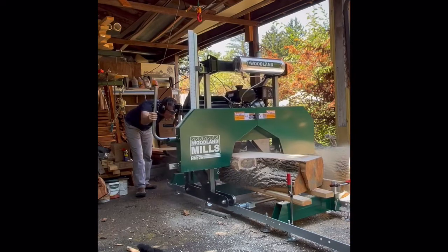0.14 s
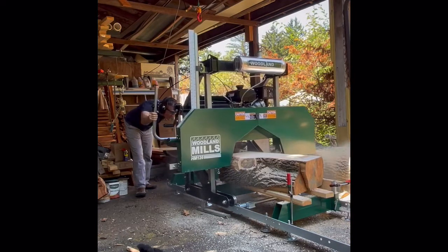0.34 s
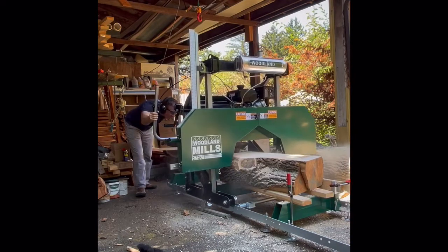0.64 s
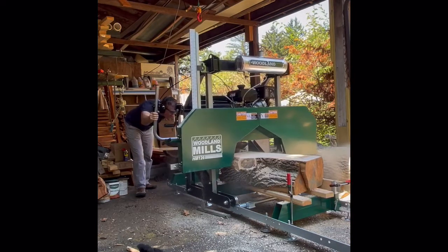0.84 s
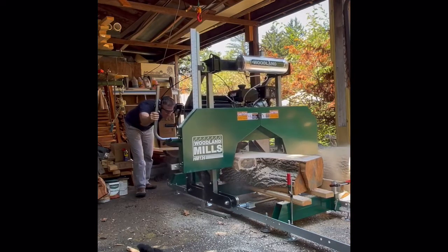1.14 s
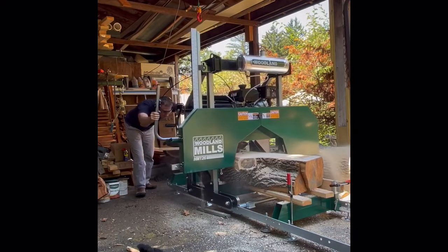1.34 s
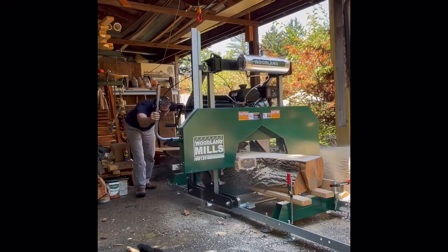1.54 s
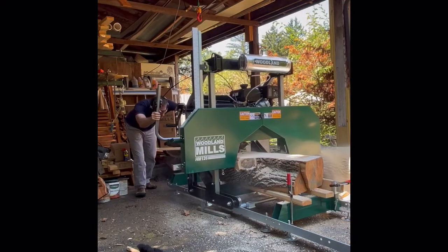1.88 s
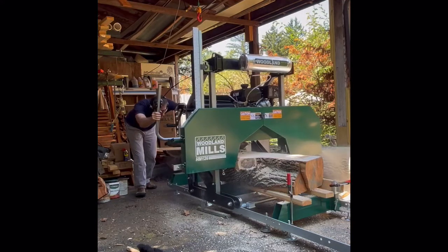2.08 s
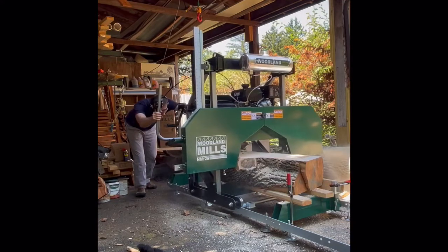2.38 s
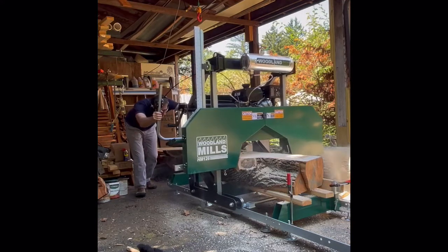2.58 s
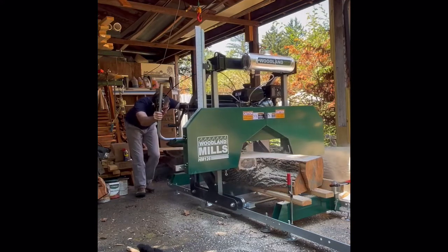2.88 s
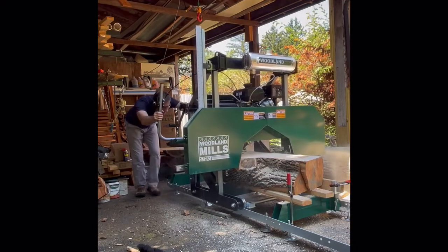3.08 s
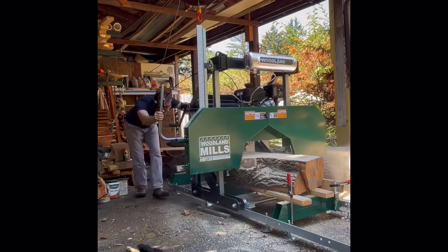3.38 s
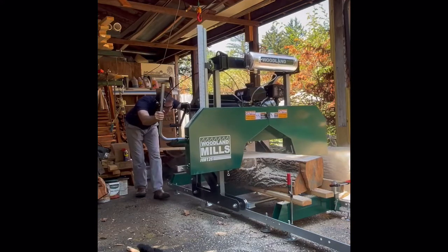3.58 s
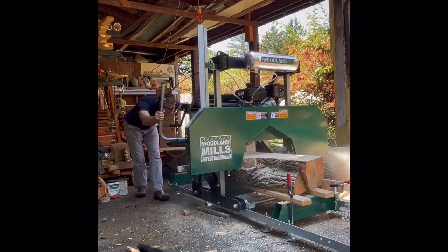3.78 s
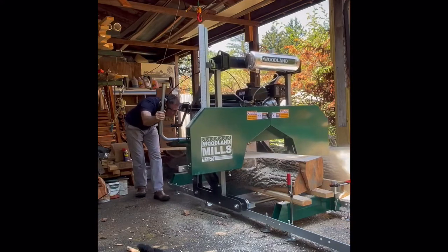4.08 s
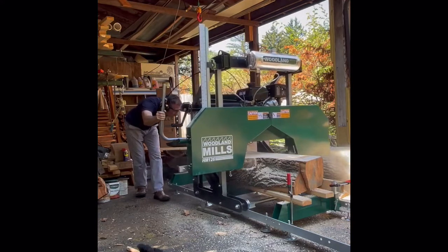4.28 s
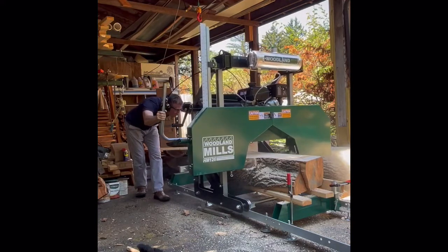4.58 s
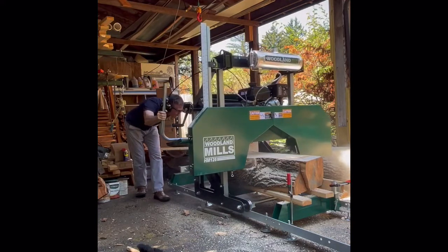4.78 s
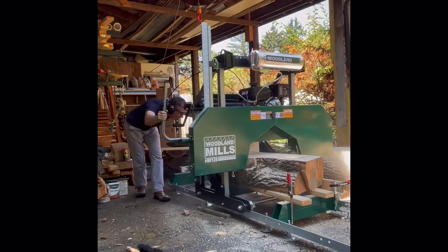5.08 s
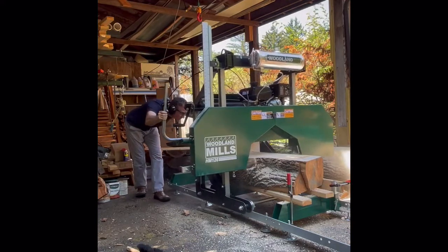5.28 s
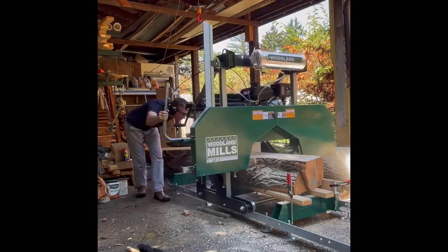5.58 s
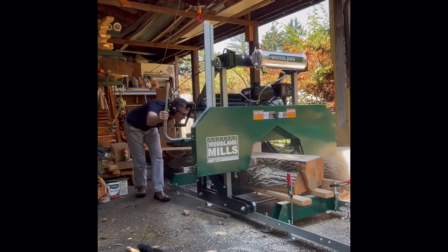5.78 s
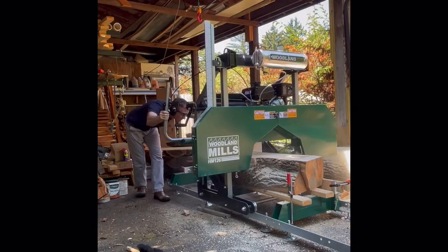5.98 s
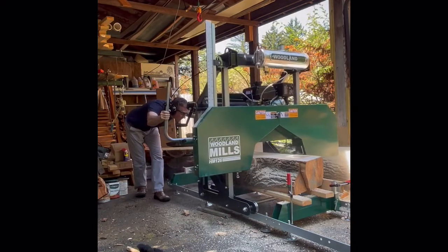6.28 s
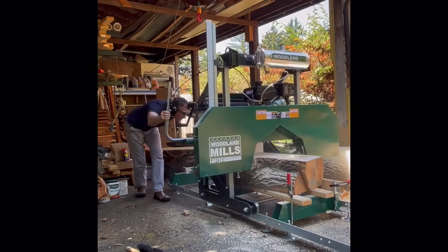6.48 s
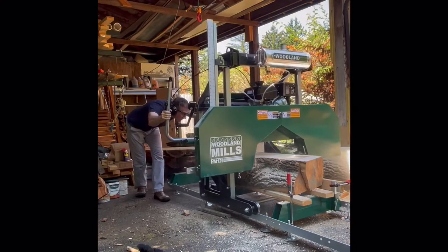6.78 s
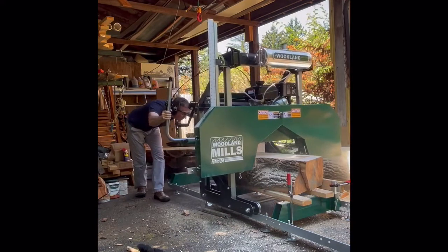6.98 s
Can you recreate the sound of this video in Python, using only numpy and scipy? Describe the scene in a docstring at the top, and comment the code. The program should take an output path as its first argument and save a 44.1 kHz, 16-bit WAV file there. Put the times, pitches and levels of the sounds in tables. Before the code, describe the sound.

Steady chugging single-cylinder engine roar with a gritty saw-blade rasp, clattering metal covers and hiss; it labours lower, knocks harder, then picks up.

```python
"""Under an open wooden shed, a single-cylinder four-stroke engine drives a band sawmill through a log.
The engine, built from multiples of its firing rate and noisy puffs, throbs, barks and knocks at each firing.
It sags as the blade bites deeper and picks up speed again; the saw frame drones along.
Random snaps make the teeth rasp and chips tap the guard; filtered noise makes the band sing,
the covers clatter and the cooling fan hiss with the speed."""
import sys
import numpy as np
from scipy import signal
from scipy.fft import rfft, irfft, next_fast_len
from scipy.io import wavfile

SR = 44100
rng = np.random.default_rng(int(sys.argv[2]) if len(sys.argv) > 2 else 0)


def materialize(psi):
    """Save the field psi as 16-bit PCM at rate SR to the path in sys.argv[1].

    A 1-D psi becomes a single channel; in a 2-D psi each row is a channel.
    """
    bounded = np.clip(np.atleast_2d(psi).T, -1, 1)
    quanta = np.round(bounded * 32767).astype(np.int16)
    wavfile.write(sys.argv[1], SR, quanta)


N = 314874   # length in samples
TIME = np.arange(N) / SR   # seconds
FFT_SIZE = next_fast_len(N, True)
HZ = np.maximum(np.arange(FFT_SIZE // 2 + 1) * SR / FFT_SIZE, 1)


def from_db(db):
    """Turn decibels into gain."""
    return np.exp(np.asarray(db) * (np.log(10) / 20))


def rms_one(x):
    """Scale to unit power."""
    return x / np.sqrt(np.mean(x ** 2) + 1e-20)


def in_time(rows):
    """Draw each column of a table as a curve with a value at every sample."""
    s, *columns = np.transpose(rows)
    return [np.interp(TIME, s, column) for column in columns]


def at_hz(points, hz):
    """Read a spectrum on a log-frequency axis."""
    point_hz, value = np.array(points)[:, :2].T
    return np.interp(np.log(hz), np.log(point_hz), value)


def drift(rate_hz):
    """Wander at random with spread 1: noise smoothed twice, so that little above rate_hz is left."""
    step = 40   # computed at every 40th sample, then joined by lines
    r = np.exp(-2 * np.pi * step * rate_hz / SR)
    noise = rng.standard_normal(N // step + 2002)
    slow = signal.lfilter([1], [1, -2 * r, r * r], noise)[2000:]   # skip the filter's start
    return np.interp(np.arange(N) / step, np.arange(len(slow)), rms_one(slow))


def resonance_db(modes, hz):
    """Add up the power of resonances that ring side by side, in dB."""
    power = 0
    for centre, width, db in modes:
        power = power + from_db(db) ** 2 / (1 + ((hz - centre ** 2 / hz) / width) ** 2)
    return 10 * np.log10(power)


def sag_of(rate):
    """Load on the engine: firings per second below full speed."""
    return rate.max() - rate


# How much louder the left is. Each row: frequency in Hz, left above right in dB.
LEFT_OVER_RIGHT = [(55, 0), (99, 2.5), (160, 6.5), (270, 5.5), (450, 9.5), (740, 4.5), (1220, -0.6),
                   (2010, 0.2), (3330, -1.3), (5500, 0), (15000, -0.2)]
# How far the left runs ahead. Each row: frequency in Hz, lead of the left in radians.
LEFT_LEAD = [(260, 0), (400, -.4), (780, -1.4), (1200, -.6), (1800, -.15), (2800, -.5), (4200, -.3),
             (4900, -2.1), (5500, .1), (7000, 1.3), (8900, 3.1), (11400, 3.18), (12500, 4.4), (13900, 6.28)]
# How alike left and right are. Each row: frequency in Hz, likeness from 0 (unrelated) to 1 (the same).
SIDES_ALIKE = [(150, .97), (300, .8), (550, .68), (1200, .7), (1800, .8), (2800, .62), (3600, .68),
               (4400, .55), (5500, .74), (7800, .72), (9200, .99), (11400, .99), (12500, .66), (14000, .93)]


def side_gains():
    """Per side and frequency: gain of the sound both sides share, and of the sound in which they differ."""
    sides = np.array([[1], [-1]])
    alike = np.clip(at_hz(SIDES_ALIKE, HZ), 0, 1)
    level = from_db(sides * at_hz(LEFT_OVER_RIGHT, HZ) / 2)
    gain = level * np.exp(.5j * sides * at_hz(LEFT_LEAD, HZ))
    return gain * np.sqrt(1 + alike), gain * sides * np.sqrt(1 - alike)


SHARED_GAIN, APART_GAIN = side_gains()


def in_stereo(excitation, colour_db):
    """Mix two coloured noises into partly alike sides; lead and likeness change with frequency; rms 1."""
    shared, apart = rfft(excitation, FFT_SIZE) * from_db(colour_db(HZ))
    return rms_one(irfft(SHARED_GAIN * shared + APART_GAIN * apart, FFT_SIZE)[:, :N])


# Colour of the clatter of frame and covers. Each row: frequency in Hz, strength in dB per Hz.
RUMBLE_COLOUR = [(20, -24), (38, -21), (70, -8), (130, -3), (190, 0), (240, -2.5), (330, -3), (400, -0.5),
                 (470, 1.5), (600, 2), (1100, -1), (1700, -6), (4200, -10), (5200, -18), (15000, -32)]


def rumble(cycle, level_db=-26.8, shake_db=-1.7, shake_at=0.19, uneven_db=0.6):
    """Frame and covers clatter as noise, shaken twice per cycle by the piston."""
    shake_now_db = shake_db * np.cos(4 * np.pi * (cycle - shake_at)) + uneven_db * drift(50)
    shaken = rng.standard_normal((2, N)) * from_db(shake_now_db)
    return from_db(level_db) * in_stereo(shaken, lambda hz: at_hz(RUMBLE_COLOUR, hz))


# Colour of the moving air. Each row: frequency in Hz, strength in dB per Hz.
FAN_COLOUR = [(300, -19), (900, 1), (1700, -3.5), (2900, 2), (4300, -1.5), (5100, -4), (6800, -1),
              (8000, -3), (11800, -9), (13500, -6), (14600, -10), (15800, -16)]


def fan(rate, level_db=-26.5, db_per_firing=1.7, swirl_db=1.54):
    """Air from the flywheel fan and the band wheels: the hiss climbs with speed and swirls."""
    air = rng.standard_normal((2, N)) * from_db(swirl_db * drift(12.4))
    speed_db = level_db - db_per_firing * sag_of(rate)
    return from_db(speed_db) * in_stereo(air, lambda hz: at_hz(FAN_COLOUR, hz))


# The frame's loosest modes. Each row: frequency in Hz, width in Hz, level in dB before sharpening.
FRAME_MODES = [(200, 12, -20), (208, 18, -4)]


def frame_drone(drone_db, level_db=-43.0):
    """The cut shakes the frame at random, so it hums unsteadily on its own modes."""
    shaking = rng.standard_normal((2, N))
    # doubling the dB sharpens the modes
    hum = in_stereo(shaking, lambda hz: 2 * resonance_db(FRAME_MODES, hz))
    return from_db(level_db + drone_db) * hum


def chips(hits_per_s=22, width_hz=36, low_hz=620, high_hz=4200, tilt_db=3.5, spread_db=1, count=26):
    """Chips and loose covers tap the sheet-metal guard, ringing one of its many modes at a time."""
    out = np.zeros((2, N))
    many = int(hits_per_s * N / SR)   # taps on each mode
    r = np.exp(-np.pi * width_hz / SR)
    for k, hz in enumerate(np.geomspace(low_hz, high_hz, count)):
        taps = np.zeros((2, N))
        side, when, size = rng.random((many, 3)).T
        tap_db = tilt_db * k / count - spread_db * size
        taps[(2 * side).astype(int), (when * N).astype(int)] = from_db(tap_db)
        w = 2 * np.pi * hz / SR
        # the tiny offset keeps the filter out of very slow arithmetic
        out += signal.lfilter([0, np.sin(w)], [1, -2 * r * np.cos(w), r * r], taps + 1e-18)
    return in_stereo(out, np.zeros_like)


# Modes on which the band chatters. Each row: frequency in Hz, width in Hz, level in dB.
SING_MODES = [(3360, 100, 0.5), (3577, 64, 4.5), (3900, 72, -3)]
# the chatter grows beyond this sag (firings per s), by this much per further firing/s lost (dB)
SING_SAG, SING_DB_PER_SAG = 2.7, 6.5


def blade_sing(sag, cycle, level_db=-39.0, chatter_db=1.0, tug_db=2.0, tug_at=0.24):
    """When the teeth dig in hard, the band chatters louder on a few modes, surging at each crank turn."""
    tug_now_db = tug_db * np.cos(4 * np.pi * (cycle - tug_at))   # two turns per cycle
    chatter = rng.standard_normal((2, N)) * from_db(chatter_db * drift(37) + tug_now_db)
    dig_db = SING_DB_PER_SAG * np.maximum(sag - SING_SAG, 0)
    return from_db(level_db + dig_db) * in_stereo(chatter, lambda hz: resonance_db(SING_MODES, hz))


# Ringing of blade and guard under the teeth. Each row: frequency in Hz, width in Hz, level in dB.
BLADE_MODES = [(1334, 190, 5), (2106, 140, 3.5), (2790, 310, 6.5), (3500, 880, -0.5), (4650, 130, 5),
               (5730, 56, -13)]


def rasp(snaps_per_s=3000, size_db=3, clump_db=4):
    """Teeth tear out fibres of uneven size in clumps; each snap rings the blade and its guard."""
    torn = rng.random((2, N)) < snaps_per_s * from_db(clump_db * drift(70)) / SR
    size = np.minimum(rng.exponential(1, (2, N)), 4)
    snaps = torn * from_db(size_db * size) * rng.choice([-1, 1], (2, N))
    return in_stereo(snaps, lambda hz: resonance_db(BLADE_MODES, hz))


def surge_db(stroke, depth_db=0.5, peak_at=0.21):
    """The band is tugged forward at each firing, so the cut swells once per cycle."""
    return depth_db * np.cos(2 * np.pi * (stroke - peak_at))


def stroke_of(cycle, rate, opens=0.085, late_per_sag=0.021):
    """Exhaust strokes counted from the opening of the valve; a labouring engine puffs later."""
    return cycle - opens - late_per_sag * sag_of(rate) + 1


# Colour of the exhaust puffs. Each row: frequency in Hz, strength in dB per Hz.
BARK_COLOUR = [(30, -40), (150, -21), (400, -3), (700, -0.5), (950, -4.5), (1270, -0.5), (1700, -9.5),
               (2900, -7.5), (4300, -9.5), (5200, -13.5), (7000, -12), (11800, -21), (14200, -13.5),
               (15800, -27)]
# each puff: rise (s), decay (s), share of its power that repeats from cycle to cycle
PUFF_RISE_S, PUFF_DECAY_S, PUFF_REPEATS = 0.004, 0.005, 0.15


def bark(stroke, rate, echo=0.065, echo_s=0.089, gulp=0.049, gulp_at=0.77, gulp_width=0.24,
         uneven_db=0.5, grit_db=1.0):
    """One noisy puff per cycle, partly the same pipe ring every time; a weaker gulp of intake air follows."""
    age = stroke % 1 / rate   # seconds since the valve opened
    pipe = rng.standard_normal((2, SR // 10))[:, (age * SR).astype(int)]
    fresh = rng.standard_normal((2, N))
    gas = np.sqrt(PUFF_REPEATS) * pipe + np.sqrt(1 - PUFF_REPEATS) * fresh
    chance = rng.standard_normal(256)[stroke.astype(int)]   # one draw per puff
    rise = 1 - np.exp(-(age / PUFF_RISE_S) ** 2)
    # each puff dies fast, then lingers under the roof
    puff = rise * (np.exp(-age / PUFF_DECAY_S) + echo * np.exp(-age / echo_s))
    intake = gulp * np.exp(-((stroke % 1 - gulp_at) / gulp_width) ** 2)
    uneven = from_db(uneven_db * chance + grit_db * drift(300))
    return in_stereo(gas * (puff + intake) * uneven, lambda hz: at_hz(BARK_COLOUR, hz))


# beyond this sag (firings per s) the engine lugs: after a lag (s) the knock gains (dB per further firing/s)
LUG_SAG, LUG_LAG_S, KNOCK_DB_PER_LUG = 2.4, 0.15, 6
KNOCK_DB_PER_SAG = -2   # every firing per s lost, lugging or not


def strain_db(rate):
    """The muffler's knock softens as the engine slows, but gains sharply, a little late, when it lugs."""
    lug = np.maximum(sag_of(rate) - LUG_SAG, 0)
    late_lug = np.interp(TIME - LUG_LAG_S, TIME, lug)
    return KNOCK_DB_PER_SAG * sag_of(rate) + KNOCK_DB_PER_LUG * late_lug


# The hardest firings. Each row: time of the peak in seconds, knock peak in dB before hard_db is added,
# pitch in Hz, crack peak in dB before crack_db is added.
HARD_FIRINGS = [(0.0474, -18.0, 740.0, -23.0), (0.735, -19.0, 1280.0, -21.0), (0.811, -17.0, 1230.0, -25.0),
                (1.3947, -18.0, 1230.0, -23.0), (1.4342, -18.0, 1070.0, -22.0),
                (1.9105, -18.0, 1250.0, -26.0), (2.155, -19.0, 1330.0, -19.0),
                (2.3167, -22.0, 1030.0, -19.0), (2.5666, -20.0, 640.0, -22.0),
                (3.0761, -22.0, 970.0, -18.0), (3.1615, -19.0, 1080.0, -18.0),
                (3.2508, -18.0, 620.0, -22.0), (3.3377, -19.0, 1080.0, -22.0),
                (3.4256, -19.0, 1140.0, -25.0), (3.6017, -18.0, 1320.0, -23.0),
                (3.69, -16.0, 1160.0, -27.0), (3.7326, -21.0, 800.0, -18.0), (3.8236, -17.0, 1270.0, -23.0),
                (3.8667, -16.0, 1330.0, -24.0), (3.9088, -19.0, 1290.0, -21.0),
                (4.0366, -15.0, 1270.0, -23.0), (4.0801, -19.0, 1310.0, -23.0),
                (4.1224, -15.0, 1230.0, -20.0), (4.335, -22.0, 730.0, -20.0),
                (4.4216, -19.0, 1310.0, -23.0), (4.5919, -17.0, 1210.0, -21.0),
                (4.6358, -19.0, 1380.0, -22.0), (4.8484, -17.0, 1190.0, -22.0),
                (4.9705, -19.0, 820.0, -23.0), (5.05, -21.0, 1120.0, -20.0), (5.1271, -20.0, 1240.0, -23.0),
                (5.2081, -19.0, 1050.0, -21.0), (5.2464, -19.0, 1180.0, -24.0),
                (5.3994, -17.0, 1290.0, -24.0), (6.4139, -17.0, 1210.0, -30.0),
                (6.7894, -18.0, 1290.0, -26.0)]
# Colour of a knock's crack. Each row: frequency in Hz, strength in dB per Hz.
CRACK_COLOUR = [(500, -28), (1500, -8), (2300, -1), (3000, 0), (4000, 0), (5200, -8), (8000, -14),
                (15000, -22)]
CRACK_UNDER_DB = -4   # an ordinary crack against its knock, before crack_db is added


def knocks(stroke, rate, level_db=-26.5, hard_db=-0.5, crack_db=-5.0, ring_hz=1200, spread_hz=190,
           uneven_db=0.5, delay_s=0.006, width_s=0.0031):
    """Every firing rings the muffler for a few cycles with a bright crack; some are much harder."""
    opened = np.flatnonzero(np.diff(np.floor(stroke)))   # samples at which the valve opens
    size, pitch, edge = rng.standard_normal((len(opened), 3)).T
    usual_db = level_db + strain_db(rate)[opened] + uneven_db * size
    usual_edge_db = usual_db + CRACK_UNDER_DB + uneven_db * edge
    usual = np.transpose([opened / SR + delay_s, usual_db, ring_hz + spread_hz * pitch, usual_edge_db])
    hard = np.array(HARD_FIRINGS) + [0, hard_db, 0, 0]
    # a hard firing replaces the ordinary one beside it
    usual = [row for row in usual if np.abs(hard[:, 0] - row[0]).min() > .5 / rate.max()]
    ring, burst = np.zeros((2, N))
    for s, db, hz, edge_db in [*usual, *hard]:
        near = slice(max(int((s - 10 * width_s) * SR), 0), int((s + 10 * width_s) * SR))
        t = TIME[near] - s
        swell = np.exp(-(t / width_s) ** 2)
        ring[near] += from_db(db) * swell * np.sin(2 * np.pi * hz * t)
        burst[near] += from_db(edge_db + crack_db) * swell
    crack = burst * in_stereo(rng.standard_normal((2, N)), lambda hz: at_hz(CRACK_COLOUR, hz))
    ring_sides = irfft(rfft(ring, FFT_SIZE) * SHARED_GAIN / np.sqrt(2), FFT_SIZE)[:, :N]
    return ring_sides + crack


# Resonances of muffler, saw frame and shed that the firings excite.
# Each row: frequency in Hz, width in Hz, level in dB.
BODY_MODES = [(53.4, 10.9, -27.0), (72.5, 7.2, -34.5), (101.7, 12.7, -26.4), (114.8, 8.6, -33.3),
              (134.3, 16.1, -26.2), (151.7, 9.6, -26.6), (160.4, 4.4, -30.6), (174.5, 15.2, -35.0),
              (188.2, 10.0, -27.8), (207.0, 6.6, -27.0), (239.4, 22.4, -33.4), (266.0, 13.3, -35.9),
              (284.0, 25.1, -35.9), (315.6, 18.2, -34.1), (338.5, 8.0, -38.5), (361.9, 22.4, -43.4),
              (392.9, 12.9, -29.3), (405.4, 20.6, -35.4), (437.6, 18.3, -40.4), (481.5, 30.3, -45.1),
              (512.7, 30.9, -46.9), (593.0, 45.0, -45.0), (661.0, 18.0, -42.5)]
# The growl above the drone, which swells and fades during the cut. Each row: time in seconds, level in dB.
GROWL_LEVEL = [(0.0, -0.5), (0.9, 2), (1.1, -0.5), (1.6, 4.5), (2.1, 1.5), (2.6, 0), (3.1, -2), (3.7, -4),
               (4.6, -3), (4.95, 1.8), (5.15, 1), (5.4, 1), (5.9, 1.9), (6.5, -0.6), (7.14, -2)]
# the flywheel keeps the hum steady: wander of the crank (cycles), waver of each line (dB)
CRANK_JITTER, WAVER_DB = 0.001, 0.9


def throb(cycle, rate, drone_db, piston_lead=0.038, piston_smear=0.0026, firing_lag=0.102,
          firing_smear=0.0191, drone_hz=197, drone_width_hz=28, growl_from_hz=215, growl_full_hz=245,
          growl_lag=0.458, piston_order=7, count=29):
    """Clean multiples of the firing rate swell, fade and shift as they slide through fixed resonances."""
    out = np.zeros((2, N))
    grid = np.arange(1, 1000)   # Hz
    power, held_back = 0, 0
    for hz, width, db in BODY_MODES:
        offset = 2 * (grid - hz) / width
        power = power + (from_db(db) / (1 + offset ** 2)) ** 2
        held_back = held_back + 2 * np.arctan(offset)   # delay as phase, in radians
    body = np.sqrt(power)
    tilt = from_db(at_hz(LEFT_OVER_RIGHT, grid) / 2)
    in_frame = np.exp(-((grid - drone_hz) / drone_width_hz) ** 2)
    growl_db, = in_time(GROWL_LEVEL)
    crank = cycle + CRANK_JITTER * drift(2)
    for k in range(2, count):
        hz = k * rate
        in_growl = np.interp(hz, [growl_from_hz, growl_full_hz], [0, 1])
        swell_db = drone_db * np.interp(hz, grid, in_frame) + growl_db * in_growl
        level = np.interp(hz, grid, body) * from_db(WAVER_DB * drift(3.2) + swell_db)
        if k > piston_order:   # each resonance delays the upper orders, spreading them into uneven sub-beats
            phase = 2 * np.pi * k * (crank - growl_lag) - np.interp(hz, grid, held_back)
            line = level * np.cos(phase)
        elif k % 2:   # odd orders come from the firing alone; reflections smear them
            line = level * np.sin(2 * np.pi * (k * (crank - firing_lag) - firing_smear * k * k))
        else:   # even orders add up to the piston's thump, once per turn of the crank
            line = level * np.cos(2 * np.pi * (k * (crank + piston_lead) - piston_smear * k * k))
        lean = np.interp(hz, grid, tilt)
        out[0] += line * lean
        out[1] += line / lean
    return out


# Engine speed. Each row: time in seconds, firings per second.
ENGINE_SPEED = [(0.0, 26.036), (0.6, 26.224), (1.0, 25.745), (1.8, 25.192), (2.1, 24.601), (2.7, 23.62),
                (3.0, 23.462), (3.3, 22.706), (3.8, 22.718), (4.0, 23.494), (4.6, 23.322), (5.0, 24.504),
                (5.2, 25.878), (6.0, 26.781), (7.14, 26.664)]
# The drone near 200 Hz, which swells and fades during the cut. Each row: time in seconds, level in dB.
DRONE_LEVEL = [(0.0, 3), (1.0, 3), (1.15, 0.4), (1.7, -0.4), (2.2, 5), (2.8, -4), (3.05, 0.5), (3.35, 7),
               (3.6, -4.5), (3.85, -4), (4.0, 4.5), (4.7, 3.5), (5.0, 10.5), (5.25, -1), (5.7, 3), (6.2, 3),
               (6.55, -3), (6.8, 2.8), (7.14, 4.5)]
# the load shows as sag, the firings per s lost from full speed; each one lost adds this much (dB)
BARK_DB_PER_SAG, BITE_DB_PER_SAG = 0.43, 0.6


def scene(rasp_db=-31.5, chips_db=-30.5, bark_db=-27.6, first_cycle=0.0654):
    """One crankshaft times the engine's sounds; the saw runs on top, and bark and rasp grow with the load."""
    rate, = in_time(ENGINE_SPEED)
    drone_db, = in_time(DRONE_LEVEL)
    sag = sag_of(rate)
    cycle = first_cycle + np.cumsum(rate) / SR
    stroke = stroke_of(cycle, rate)
    background = rumble(cycle) + fan(rate) + frame_drone(drone_db)
    cut = from_db(chips_db) * chips() + blade_sing(sag, cycle)
    cut += from_db(rasp_db + BITE_DB_PER_SAG * sag) * rasp()
    exhaust = from_db(bark_db + BARK_DB_PER_SAG * sag) * bark(stroke, rate) + knocks(stroke, rate)
    engine = exhaust + throb(cycle, rate, drone_db)
    return background + from_db(surge_db(stroke)) * cut + engine


def record(dry, cutoff_hz=15900):
    """The treble above the cutoff is removed steeply."""
    return signal.sosfilt(signal.ellip(12, .1, 90, cutoff_hz, fs=SR, output="sos"), dry)


dry = scene()
out = record(dry)
materialize(out)
```